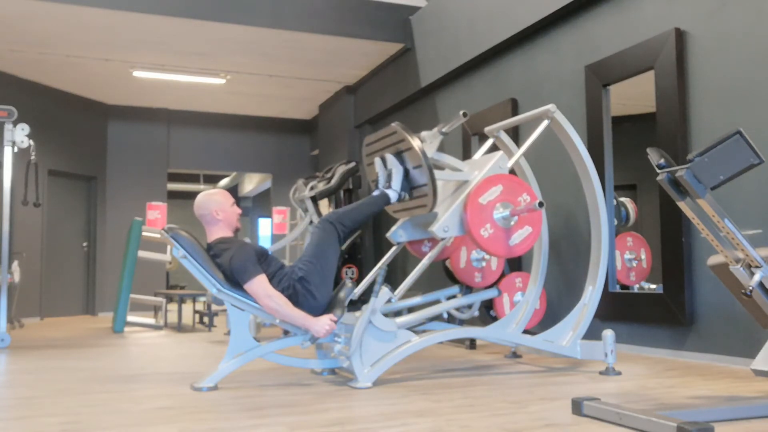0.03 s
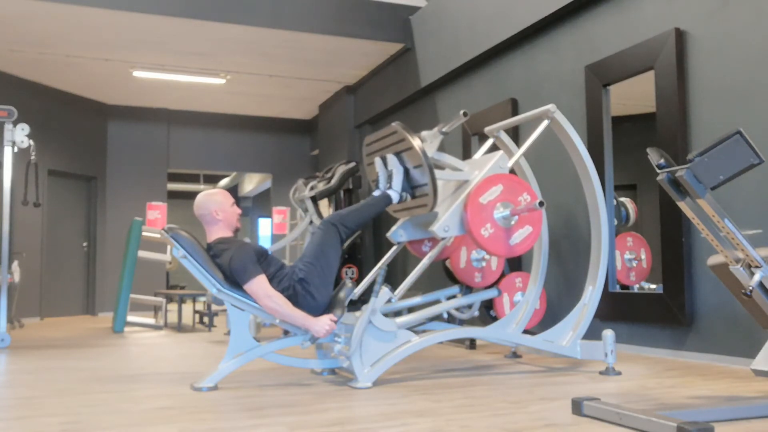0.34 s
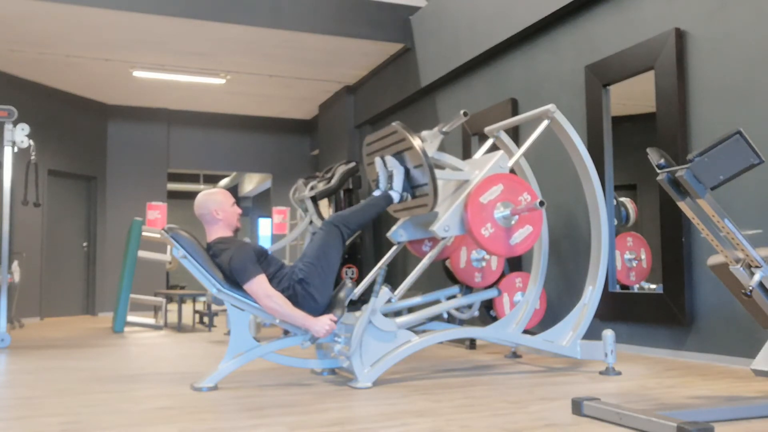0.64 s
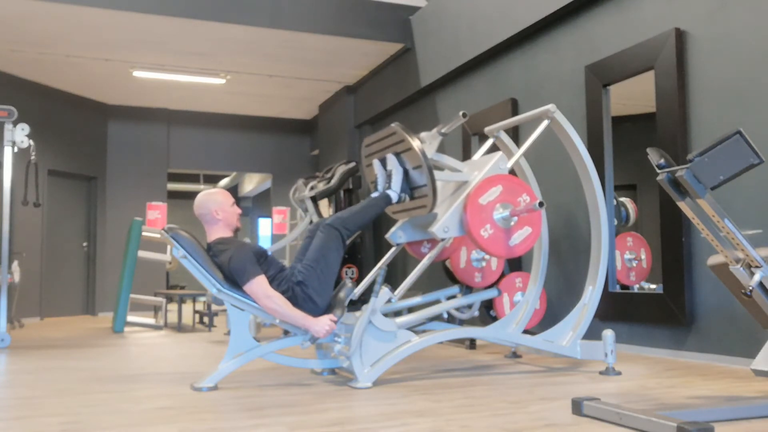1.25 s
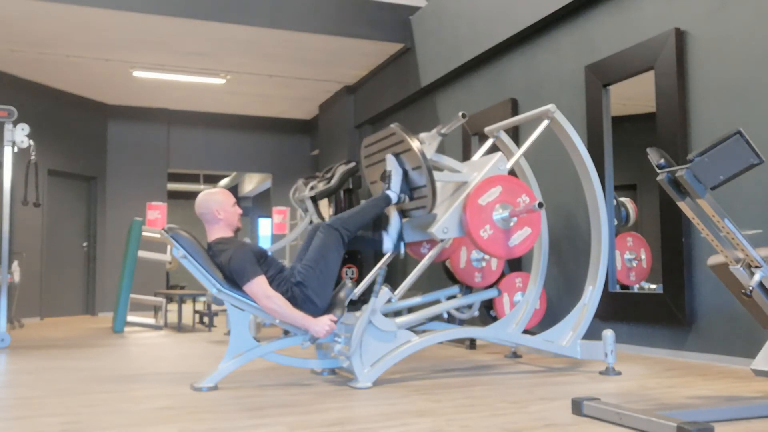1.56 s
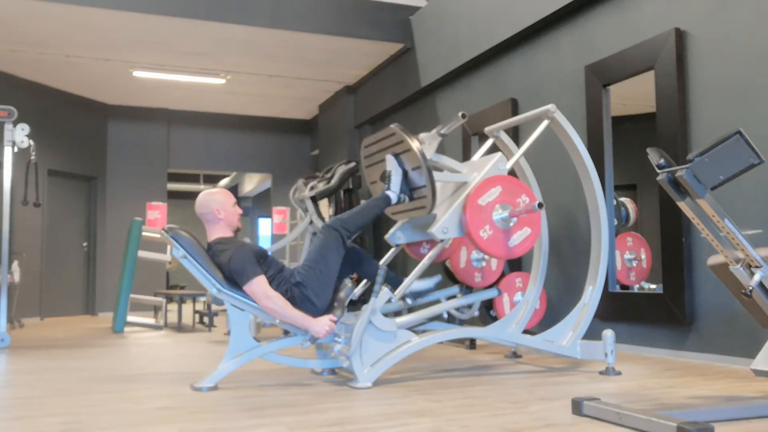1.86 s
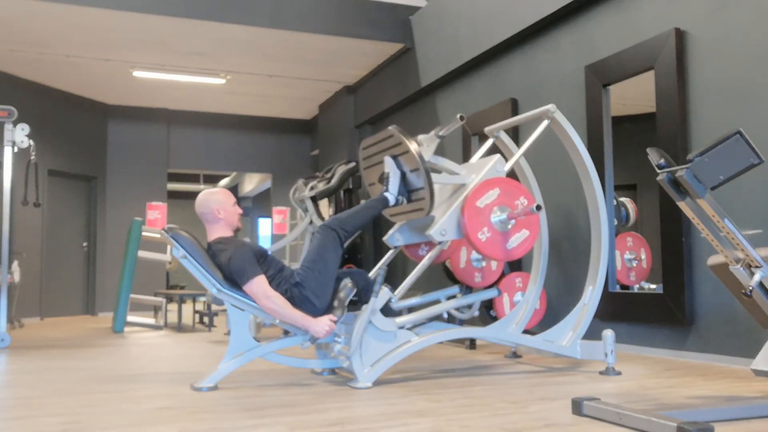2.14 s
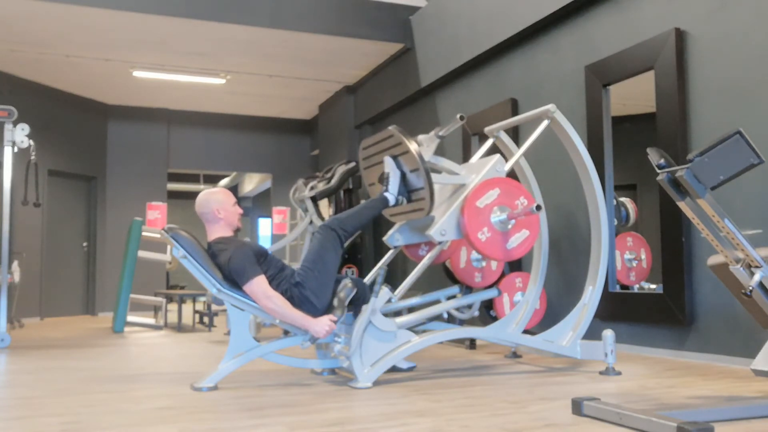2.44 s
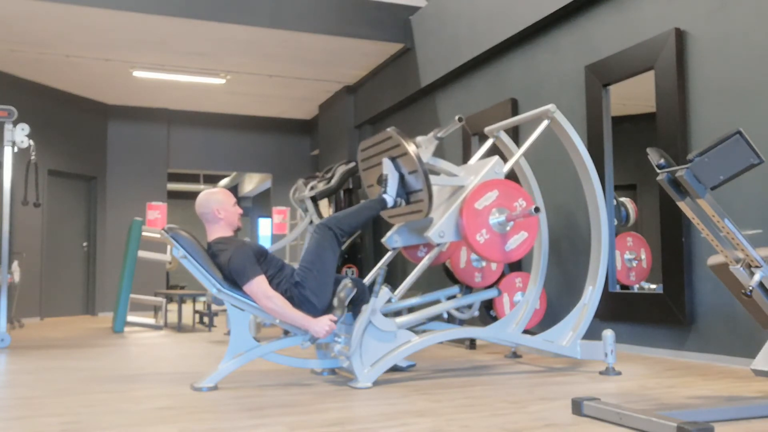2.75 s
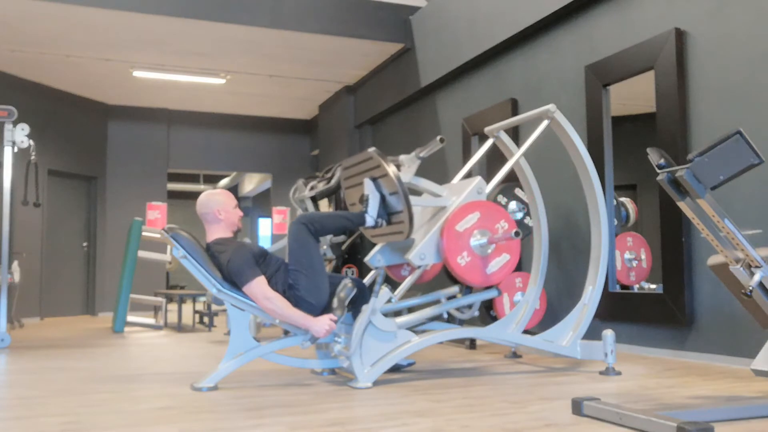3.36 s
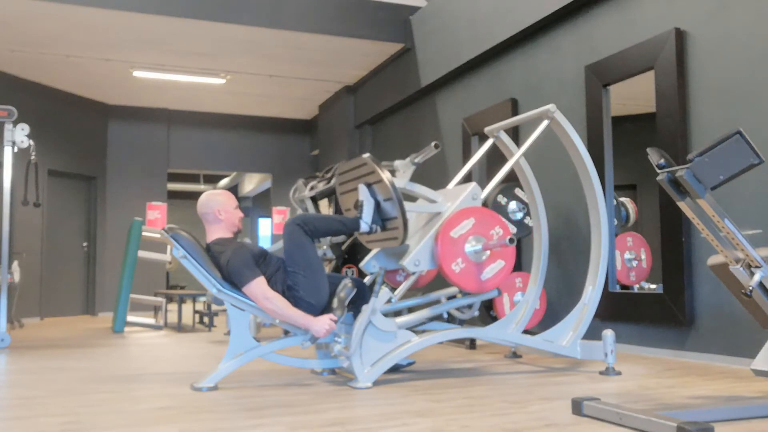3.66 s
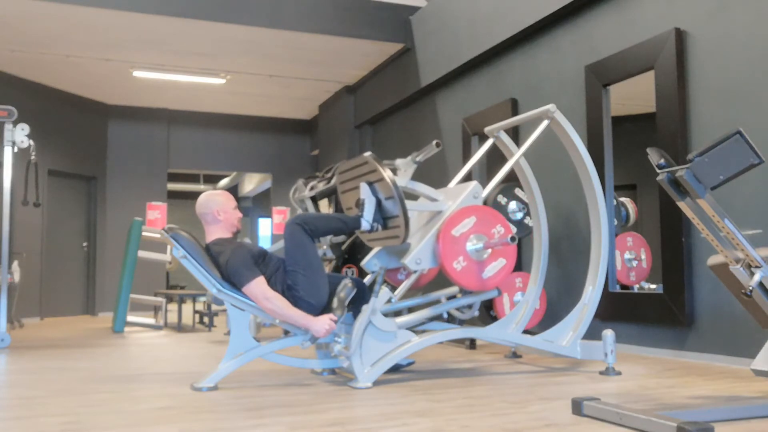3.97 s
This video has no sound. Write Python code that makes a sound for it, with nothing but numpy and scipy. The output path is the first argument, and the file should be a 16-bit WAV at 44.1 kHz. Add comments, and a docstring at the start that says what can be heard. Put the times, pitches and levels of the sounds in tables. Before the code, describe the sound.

Ventilation fills a gym with a steady low rumble, soft hiss and faint hum. A leg press gives very faint, thin squeaks now and then and clicks once a little past halfway, with a brief room echo.

```python
"""Room tone of a gym, on two microphones that hear the bass alike and the treble apart.
From the start, ventilation ducts rumble all around under a soft, slightly wavering hiss of air,
and the fans add a low hum and a few faint whines. From 0.4 s on, the leg press gives very faint,
gliding squeaks. Near 2.5 s it clicks once, with a quick rebound, and the hall answers.
A few more squeaks follow over the steady ventilation."""
import sys
import numpy as np
from scipy import signal
from scipy.fft import rfft, irfft
from scipy.io import wavfile
from scipy.ndimage import uniform_filter1d

SR = 44100
rng = np.random.default_rng(int(sys.argv[2]) if len(sys.argv) > 2 else 0)


def wav_record(signal):
    """Record a signal, one row per channel, as 16-bit PCM in the file named by sys.argv[1]."""
    frames = np.transpose(np.atleast_2d(signal))
    bounded = np.clip(frames, -1, 1)
    # unit amplitude maps onto the largest positive 16-bit level
    quanta = np.round(bounded * 32767).astype(np.int16)
    wavfile.write(sys.argv[1], SR, quanta)


N = 176400
BIN_HZ = np.fft.rfftfreq(N, 1 / SR)


def amp(db):
    """Decibels to gain."""
    return 10 ** (np.asarray(db) / 20)


def unit_rms(x):
    """Scales to rms 1."""
    return x / np.sqrt(np.mean(x ** 2) + 1e-20)


def curve_at(points, hz):
    """Reads a table on a log-frequency axis."""
    f, value = np.transpose(points)
    return np.interp(np.log(hz + 1), np.log(f + 1), value)


def add(mix, start_s, sound):
    """Mixes a sound in at a time."""
    part = mix[round(start_s * SR):][:len(sound)]
    part += sound[:len(part)]


def wander(seconds):
    """Smooth random drift of rms 1 that changes over the given time."""
    width = round(seconds * SR)
    drift = uniform_filter1d(rng.standard_normal(N), width, mode="wrap")
    return unit_rms(uniform_filter1d(drift, width, mode="wrap"))


# how alike the two microphones hear the room (frequency [Hz], correlation [-1 to 1])
MIC_CORRELATION = [(100, 1), (180, .95), (300, 0.73), (420, -0.13), (540, -0.43), (780, -0.15),
                   (1000, -0.035), (1220, 0.094), (1560, 0.41), (2100, -0.33), (2900, 0.11), (4000, -0.075),
                   (6000, 0.012)]
def diffuse_noise(spectrum, balance_db):
    """Steady noise of rms 1 reaching the microphones from all around; balance is left minus right."""
    alike = curve_at(MIC_CORRELATION, BIN_HZ)
    mid, side = rfft(rng.standard_normal((2, N))) * np.sqrt([1 + alike, 1 - alike])
    lean = amp(balance_db / 2)
    pair = np.array([(mid + side) * lean, (mid - side) / lean])
    return unit_rms(irfft(spectrum * pair, N))


# spectrum of the ducts (frequency [Hz], relative level [dB])
DUCT_SPECTRUM = [(8, -10.5), (20, -5), (28, 1.5), (34, 3), (41, 0), (48, -1), (63, -8), (85, -11.5),
                 (102, -9), (130, -17.5), (175, -26), (230, -29.6), (310, -31.5), (520, -43), (1000, -74.5)]
# swell of the deepest rumble (time [s], relative level [dB])
DUCT_SWELL = [(0.04, 3), (0.14, 0.5), (0.32, -1.5), (0.67, 1), (0.8, -2), (1.0, -2.5), (1.07, 4), (1.19, 3),
              (1.26, -3), (1.43, 1.5), (1.52, -4), (1.7, -3.5), (1.79, -3.5), (1.88, 3.5), (1.96, -12),
              (2.07, 1), (2.18, -7), (2.49, 3.5), (2.6, -1), (2.68, -6.5), (2.9, 2), (3.03, -9),
              (3.15, -2.5), (3.25, 3), (3.45, 2.5), (3.55, -1.5), (3.78, -2.5), (3.971, 3)]
def duct_rumble():
    """Air moving in the ducts swells and ebbs, most of all in the deep bass."""
    deep_top_hz, steady_s, body_share = 73, 0.1455, 0.14
    rumble = diffuse_noise(amp(curve_at(DUCT_SPECTRUM, BIN_HZ)), balance_db=0)
    deep = irfft(rfft(rumble) / (1 + (BIN_HZ / deep_top_hz) ** 6), N)
    body = rumble - deep
    deep_rms = np.sqrt(uniform_filter1d((deep ** 2).mean(0), round(steady_s * SR)))
    swell_db = np.interp(np.arange(N) / SR, *np.transpose(DUCT_SWELL))
    return amp(-28) * (amp(swell_db - 2.5) * deep / deep_rms + amp(body_share * swell_db) * body)


# spectrum of the air at the vents (frequency [Hz], relative level [dB])
VENT_SPECTRUM = [(100, -27), (400, 5.5), (850, 0.5), (1200, 3), (1400, -2), (1900, 1.5), (2100, -2),
                 (2750, -4.5), (3150, -9.5), (3800, -11), (4200, -13.5), (5800, -14), (6200, -18),
                 (7850, -18.5), (8250, -22.5), (9400, -22), (10200, -29), (11800, -36), (15500, -48)]
# waver of the hiss; only the swing about the mean counts (time [s], level [dB])
VENT_WAVER = [(0.03, -71.5), (0.12, -70.5), (0.19, -71.5), (0.38, -70.5), (0.59, -71.2), (0.68, -73),
              (0.83, -72.8), (0.94, -74), (1.17, -73), (1.29, -69.5), (1.38, -70), (1.55, -70.5),
              (1.65, -73.5), (1.74, -72.3), (1.86, -71.5), (1.95, -74.5), (2.07, -72), (2.15, -73),
              (2.3, -72), (2.55, -71.5), (2.85, -72.5), (2.97, -71), (3.02, -75), (3.13, -72), (3.43, -72),
              (3.55, -70.8), (3.67, -72.5), (3.87, -71), (3.97, -72)]
# how much of that swing each band takes (frequency [Hz], share [0 to 1])
WAVER_SHARE = [(400, 0.44), (1500, 0.95), (8000, 0.87)]
# lean of the hiss across the microphones (frequency [Hz], left minus right [dB])
VENT_BALANCE = [(120, -3), (300, -2), (600, 2), (1200, 0.6), (1800, -0.5), (2350, 4), (3100, 0), (4500, -3),
                (7000, -2), (9000, -4), (10400, 3.5), (12000, -1)]
def vent_hiss():
    """Air from the vents hisses, wavering as a whole and in small random patches."""
    patch_s, patch_hz, patch_db = 0.09, 600, 0.72
    air = diffuse_noise(amp(curve_at(VENT_SPECTRUM, BIN_HZ)), curve_at(VENT_BALANCE, BIN_HZ))
    hz, t, bands = signal.stft(air, SR, nperseg=512)
    patches = uniform_filter1d(rng.standard_normal(bands.shape[1:]), round(patch_hz / hz[1]), axis=0)
    patches = unit_rms(uniform_filter1d(patches, round(patch_s / t[1]), axis=1))
    level_db = np.interp(t, *np.transpose(VENT_WAVER))
    swing_db = curve_at(WAVER_SHARE, hz)[:, None] * (level_db - level_db.mean())
    bands *= amp(swing_db + patch_db * patches)
    return amp(-53) * signal.istft(bands, SR)[1][:, :N]


def fan_hum():
    """The main fan's low tone, a little louder on the left, wavering at each microphone."""
    pitch_hz, rms_db, balance_db, waver_db, drift_rad = 253.3, -59, 2.5, 1, 0.39
    phase = 2 * np.pi * pitch_hz * np.arange(N) / SR
    pair = []
    for side in (1, -1):
        peak = np.sqrt(2) * amp(rms_db + side * balance_db / 2 + waver_db * wander(0.11))
        pair.append(peak * np.sin(phase + drift_rad * wander(0.3)))
    return np.array(pair)


# whines of the fans (pitch [Hz], level [dB], width [Hz], left minus right [dB])
WHINES = [(707, -72, 22, 2), (1178, -75, 25, 1), (2834, -79, 4, 0), (2932, -81, 4, -2), (3518, -87, 4, 0),
          (3860, -89, 5, -1), (3909, -87, 5, -1), (6793, -94, 6, -2)]
def fan_whines():
    """Narrow tones that flutter as they cross the room to the microphones."""
    return sum(amp(db) * diffuse_noise(1 / (1 + (2 * (BIN_HZ - hz) / width_hz) ** 2), balance_db)
               for hz, db, width_hz, balance_db in WHINES)


# squeaks, probably from the machine's pivots
# (start [s], length [s], first pitch [Hz], middle pitch [Hz], last pitch [Hz], level [dB])
SLED_SQUEAKS = [(0.42, .19, 3700, 3830, 3630, -72.5), (0.87, .07, 3590, 3660, 3730, -77),
                (1.71, .11, 4420, 4520, 4600, -74), (1.95, .17, 3680, 3820, 3670, -75),
                (2.35, .05, 4540, 4505, 4470, -75), (2.77, .07, 4640, 4570, 4520, -75),
                (2.83, .08, 4510, 4570, 4600, -72), (2.95, .1, 4520, 4520, 4440, -77),
                (3.46, .09, 4560, 4590, 4570, -74), (3.6, .09, 4600, 4560, 4630, -75.5)]
def leg_press_squeaks():
    """Thin, rough tones that slide up and down as the sled moves."""
    fade_s, pitch_jitter, rough_db = 0.025, 0.004, 2.5
    out = np.zeros(N)
    for start, length, first_hz, middle_hz, last_hz, db in SLED_SQUEAKS:
        t = np.arange(round(length * SR)) / SR
        arc = np.polyfit([0, 0.5, 1], [first_hz, middle_hz, last_hz], 2)
        hz = np.polyval(arc, t / length) * (1 + pitch_jitter * wander(0.0033)[:len(t)])
        fade = np.minimum(np.minimum(t, length - t) / fade_s, 1)
        gain = amp(db + rough_db * wander(0.0057)[:len(t)])
        add(out, start, gain * fade * np.sin(2 * np.pi * np.cumsum(hz) / SR))
    return out


# reflections from close by (nominal delay [s], gain [ratio])
NEAR_ECHOES = [(.0032, 0.61), (.0042, 0.54), (.0085, .35), (.012, 0.6)]
def hall(direct):
    """Each microphone hears the direct sound, a few close reflections, then a dull, diffuse tail."""
    t60_s, dull_hz = 0.3, 3400
    t = np.arange(SR) / SR
    tail = rng.standard_normal((2, SR)) * amp(-60 * t / t60_s)
    tail /= np.linalg.norm(tail[0])
    tail = signal.sosfilt(signal.butter(2, dull_hz, fs=SR, output="sos"), tail)
    dulled = signal.sosfilt(signal.butter(1, dull_hz, fs=SR, output="sos"), direct)
    near = np.zeros((2, N))
    for mic in near:
        for delay, gain in NEAR_ECHOES:
            add(mic, delay * rng.uniform(0.87, 0.97), gain * dulled)
    return direct + near + amp(4.5) * signal.fftconvolve(direct[None], tail, axes=1)[:, :N]


# the machine's click and its rebound (time [s], energy [dB], treble cut [dB per octave])
IMPACTS = [(2.4525, -24.3, 5), (2.4835, -27.5, 14)]
# spectrum of the bare tick (frequency [Hz], relative level [dB])
TICK_SPECTRUM = [(300, -17), (800, -6.5), (1400, 2.5), (2200, -5), (3500, -8.5), (7500, -15.5), (9000, -28),
                 (16000, -40)]
# modes of the steel frame (frequency [Hz], relative level [dB], time to fall 60 dB [s])
STEEL_MODES = [(1140, -27, 0.086), (1615, -23, 0.04), (2680, -28, .1)]
def leg_press_click():
    """A sharp tick and a duller rebound, each ringing the steel frame briefly."""
    size, treble_hz = 8192, 3400
    t, hz = np.arange(size) / SR, abs(np.fft.fftfreq(size, 1 / SR))
    ring = sum(amp(db - 60 * t / t60) * np.cos(2 * np.pi * f * t) for f, db, t60 in STEEL_MODES)
    out = np.zeros(N)
    for start, db, cut_db in IMPACTS:
        log_gain = np.log(amp(curve_at(TICK_SPECTRUM, hz) - cut_db * np.log2(1 + hz / treble_hz)))
        # minimum phase packs the energy into the attack
        tick = np.fft.ifft(np.exp(np.conj(signal.hilbert(log_gain)))).real
        click = tick + amp(-14.5) * signal.fftconvolve(tick, ring)[:size]
        add(out, start, amp(db) * click / np.linalg.norm(click))
    return out


def scene():
    """The gym at the microphones: ventilation all around, the leg press sounding in the hall."""
    ventilation = duct_rumble() + vent_hiss() + fan_hum() + fan_whines()
    return ventilation + hall(leg_press_click()) + hall(leg_press_squeaks())


def record(dry):
    """The recorder cuts off the highest treble on both channels."""
    edge_hz = 15720
    lowpass = signal.firwin(511, edge_hz, window=("kaiser", 9), fs=SR)
    return signal.oaconvolve(dry, lowpass[None], "same")


dry = scene()
out = record(dry)
wav_record(out)
```